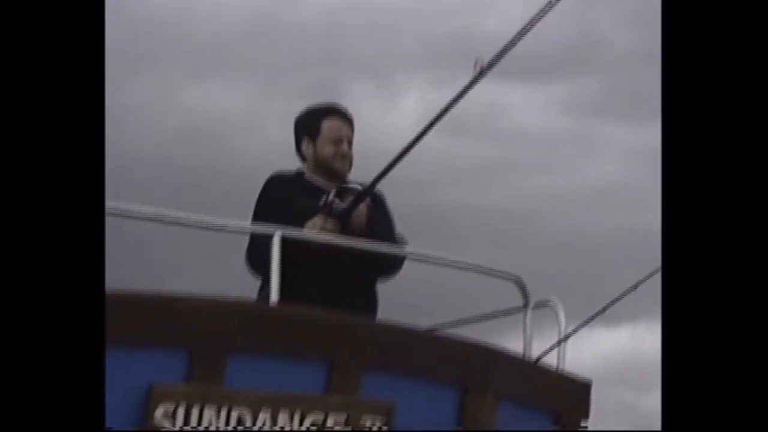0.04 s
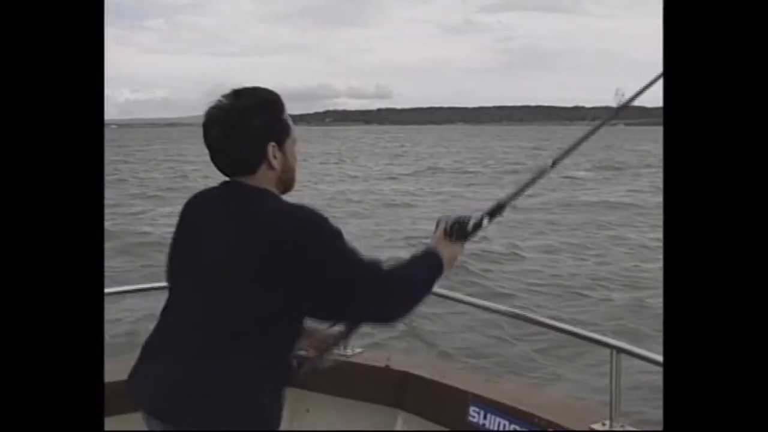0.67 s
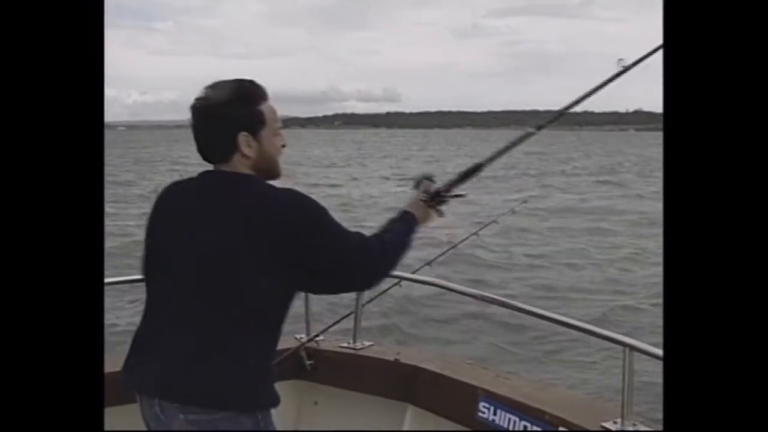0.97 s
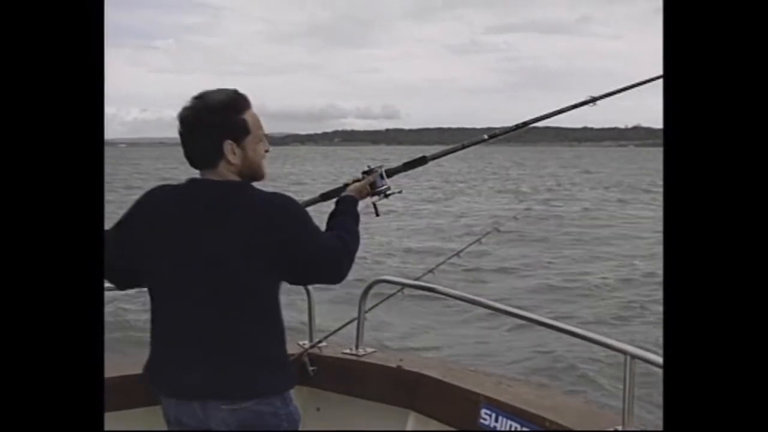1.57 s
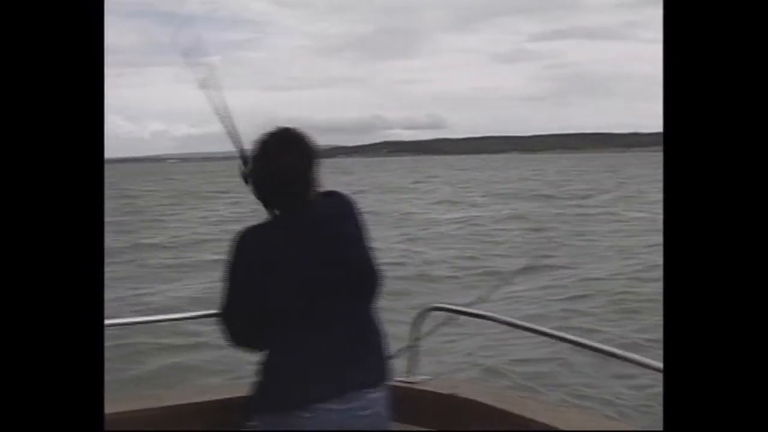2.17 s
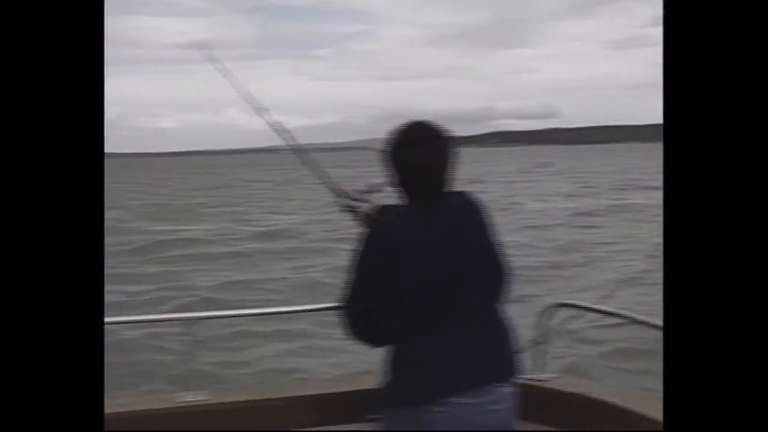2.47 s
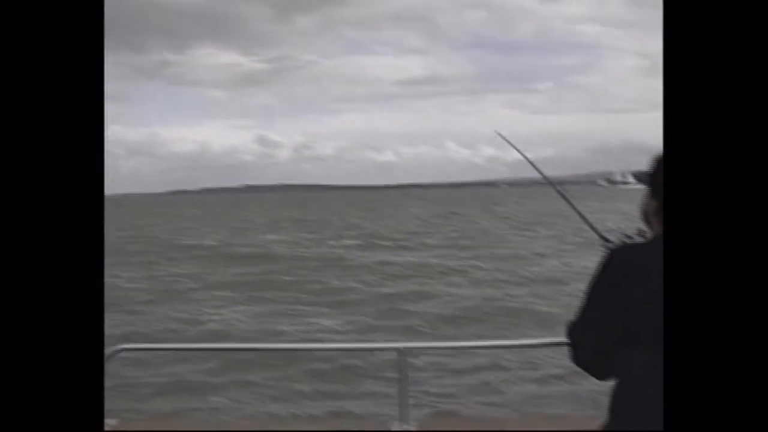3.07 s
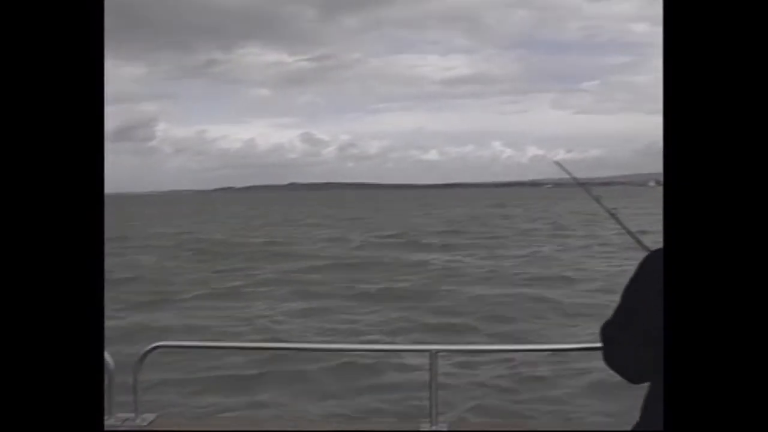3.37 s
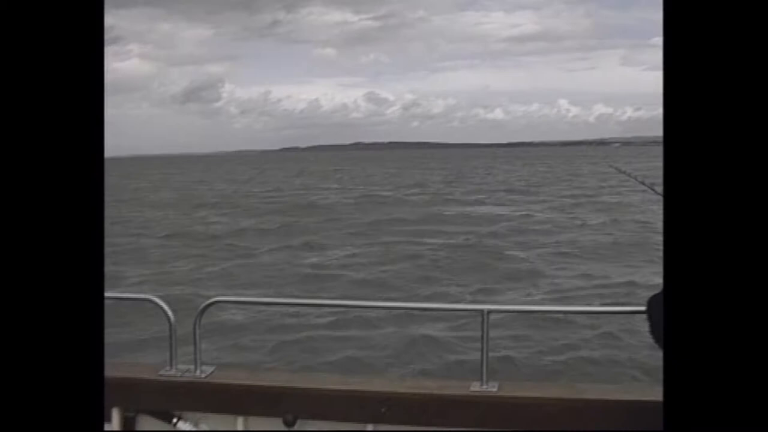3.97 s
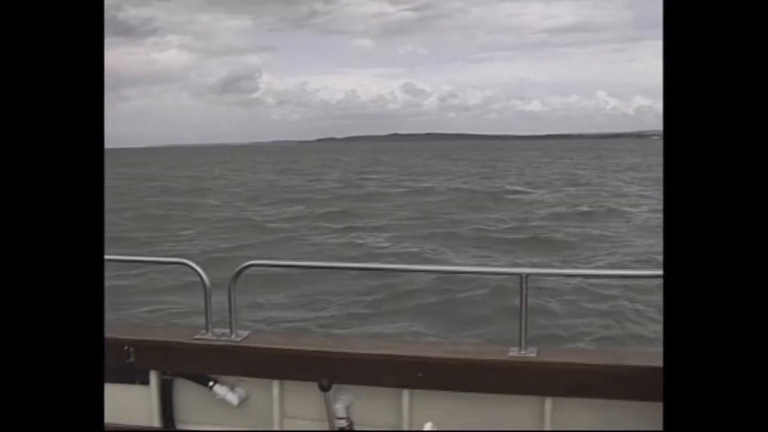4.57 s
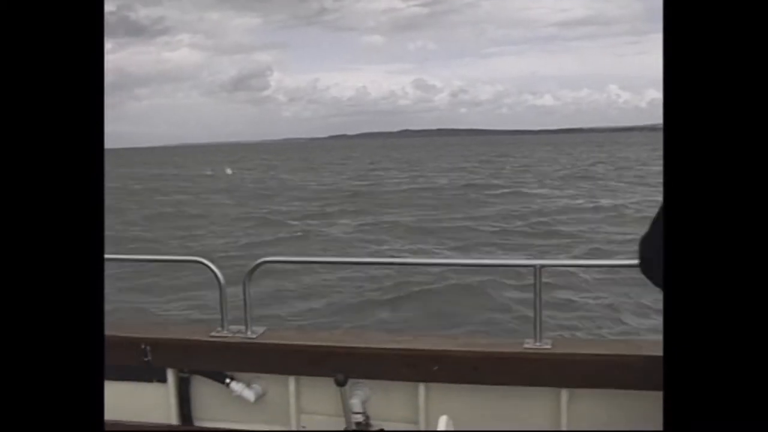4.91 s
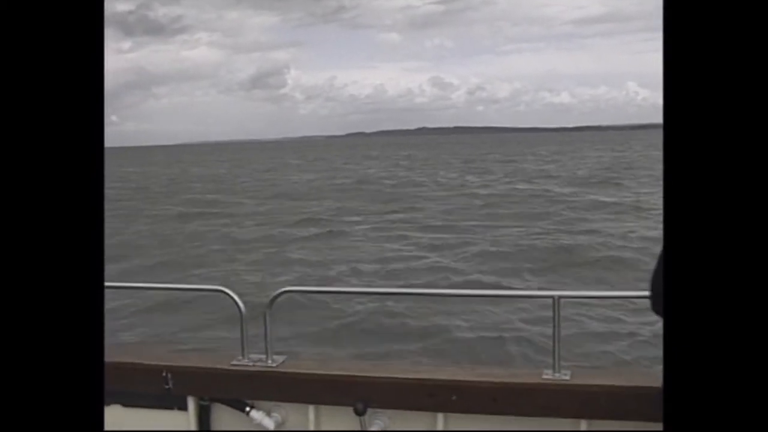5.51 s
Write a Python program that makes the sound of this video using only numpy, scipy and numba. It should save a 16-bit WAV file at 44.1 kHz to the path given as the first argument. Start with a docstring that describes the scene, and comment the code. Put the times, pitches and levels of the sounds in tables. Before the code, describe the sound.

Gusty wind buffets the microphone on a boat at sea, over a faint fishing rod swish and line hissing off the reel.

```python
"""Gusty wind buffets a camcorder microphone on the open deck of a boat while an angler casts.
Eddies rumble and thump on the microphone's port and tear into a rasp as the flow turns rough.
Far below the wind, the rod swishes, a sleeve snaps, the reel ticks and line hisses off the slowing
spool, over a faint wash of sea and the camcorder's own hiss and whine."""
import sys
import numpy as np
from scipy import signal
from scipy.fft import rfft, irfft
from scipy.io import wavfile
from scipy.ndimage import uniform_filter1d
from numba import njit

SR = 44100
rng = np.random.default_rng(int(sys.argv[2]) if len(sys.argv) > 2 else 0)


def put_to_file(sound):
    """Save the sound as 16-bit audio at rate SR, in the file named by the first command-line argument."""
    columns = np.atleast_2d(sound).T  # one column per channel
    safe = np.clip(columns, -1, 1)
    whole_steps = np.round(safe * 32767)
    wavfile.write(sys.argv[1], SR, whole_steps.astype(np.int16))


N = 249165
TIME = np.arange(N) / SR
FREQ = np.maximum(np.arange(N // 2 + 1) * SR / N, 1)

# line running off the spool after the cast: t/s, level/dB, brightest ring f/Hz
LINE_RUN = [(2.3, -76, 10160), (2.75, -64.5, 11750), (3.2, -67, 12800), (3.55, -65, 13100),
            (3.92, -65.5, 13100), (4.15, -63, 13300), (4.45, -62, 12660), (4.78, -60.5, 12750),
            (5.07, -60.5, 13800), (5.2, -65, 13800), (5.65, -72, 12800)]
RUN_START_S = LINE_RUN[0][0]


def undb(db):
    """Decibels to gain."""
    return 10 ** (np.asarray(db) / 20)


def unit(x):
    """Scale to rms 1."""
    return x / np.sqrt(np.mean(x ** 2))


def curves(table):
    """One automation curve per column, in straight lines between the times of the first column."""
    times, *columns = np.transpose(table)
    return [np.interp(TIME, times, column) for column in columns]


def swell(s, half_s):
    """A bell-shaped rise and fall around the time s."""
    return np.exp(-((TIME - s) / half_s) ** 2 / 2)


def swells(rows):
    """Envelope of several swells (t/s, half length/s, level/dB); their powers add."""
    return np.sqrt(sum((undb(db) * swell(s, half_s)) ** 2 for s, half_s, db in rows))


def colour(points):
    """EQ curve through points (f/Hz, level/dB), rolled off beyond both ends."""
    hz, db = np.transpose(points)
    ends = np.minimum(FREQ / hz[0], 1) * np.minimum(hz[-1] / FREQ, 1)
    return undb(np.interp(np.log(FREQ), np.log(hz), db)) * ends ** 2


def resonance(hz, width_hz):
    """Response of one band-pass resonance."""
    return 1 / (1 + 1j * (FREQ ** 2 - hz ** 2) / (FREQ * width_hz))


def shaped(x, response):
    """Filter a sound and scale it to rms 1."""
    return unit(irfft(rfft(x) * response, N))


def noise(response):
    """Fresh noise through a filter, rms 1."""
    return shaped(rng.standard_normal(N), response)


def wander(rate_hz):
    """Smooth random modulation, rms 1, moving at up to about rate_hz."""
    return noise(np.exp(-(FREQ / rate_hz) ** 2))


def even(x, span_s):
    """Ride the level so that it holds near rms 1 over spans longer than span_s."""
    size = max(int(span_s * SR), 2)
    return x / np.sqrt(uniform_filter1d(uniform_filter1d(x ** 2, size), size))


def burst(response, s, t60):
    """A hit of noise at s that dies away and sounds through a body, peak 1."""
    age = TIME - s
    decay = (age >= 0) * np.exp(-np.log(1000) * np.abs(age) / t60)
    hit = shaped(even(rng.standard_normal(N), 0.0023) * decay, response)
    return hit / np.abs(hit).max()


@njit
def moving_band(x, hz, width_hz):
    """State-variable band-pass whose centre glides."""
    out, band_state, low_state = np.empty(len(x)), 0., 0.
    for i in range(len(x)):
        tuning = np.tan(np.pi * min(hz[i], .45 * SR) / SR)
        damping = width_hz[i] / hz[i]
        band = (band_state + tuning * (x[i] - low_state)) / (1 + tuning * (tuning + damping))
        band_state = 2 * band - band_state
        low_state += 2 * tuning * band
        out[i] = damping * band
    return out


def sea(chop_db=-59, froth_db=1.5):
    """Choppy water washes along the hull, swelling with each wave, its froth flickering quickly."""
    # waves along the hull: t/s, half length/s, level/dB
    waves = [(.25, 1, -60), (2.35, 0.22, -53), (2.9, 0.11, -59.5), (3.76, 0.09, -55), (4.42, 0.4, -59),
             (4.79, 0.041, -56.5), (5.3, 0.47, -58.5)]
    # tone of the wash: f/Hz, level/dB
    wash_eq = [(250, -14), (600, 2.5), (1200, -0.5), (2000, -11), (2800, -17), (4000, -23), (7000, -24),
               (14000, -22)]
    return np.hypot(undb(chop_db), swells(waves)) * undb(froth_db * wander(60)) * noise(colour(wash_eq))


def turn_rate(start_hz=185.4, drag_per_s=0.24):
    """Turns a second of the spool, which slows under drag once the line runs."""
    return start_hz / (1 + drag_per_s * np.maximum(TIME - RUN_START_S, 0))


def each_turn(x, feedback=0.61, turns=7):
    """Each turn of the spool drags the line over the same flaws: a comb whose teeth sink in pitch."""
    turn_ago = np.maximum(np.arange(N) - np.round(SR / turn_rate()).astype(int), 0)
    combed = x
    for _ in range(turns):
        combed = x + feedback * combed[turn_ago]
    return unit(combed)


def spool_ring(hz, width_hz):
    """Friction noise from the turning spool in one steep resonance that glides, rms 1."""
    width = width_hz * np.ones(N)
    friction = each_turn(rng.standard_normal(N), feedback=0.72)
    return unit(moving_band(moving_band(friction, hz, width), hz, width))


def whistles(count=26, span_s=(2.65, 4.7), level_db=-15, pitch_spread=.07):
    """Single overtones of the spool whistle briefly near the brightest ring and sink as it slows."""
    _, ring_hz = curves(LINE_RUN)
    rate = turn_rate()
    turns = np.cumsum(rate) / SR
    out = 0
    for s, (accent, detune) in zip(np.linspace(*span_s, count), rng.standard_normal((count, 2))):
        overtone = np.round(np.interp(s, TIME, ring_hz / rate) * (1 + pitch_spread * detune))
        tone = np.sqrt(2) * np.sin(2 * np.pi * overtone * turns)
        out += undb(level_db + 2 * accent) * swell(s, half_s=.09) * tone
    return out


def whirr():
    """The spinning spool whirrs, thin while it is fast and raspy as it slows."""
    # the spool's resonance: t/s, f/Hz, level/dB, width/Hz
    spool = [(2.3, 4210, -80, 700), (2.95, 4180, -78, 350), (3.4, 4020, -77.5, 350), (3.9, 3800, -81, 600),
             (5.1, 4360, -85, 1300), (5.42, 4160, -71, 1000), (5.65, 4100, -80, 900)]
    hz, db, width_hz = curves(spool)
    return undb(db) * even(spool_ring(hz, width_hz), 0.044)


def squeaks(width_ratio=0.12):
    """The line squeaks on the rod's rings in narrow bands of noise."""
    # squeaks: t/s, level/dB, half length/s, f/Hz
    rubs = [(0.814, -67.5, 0.028, 7850), (0.89, -65, 0.015, 13000), (0.887, -75, .025, 4350),
            (2.303, -66, 0.032, 11900), (2.32, -72, .03, 7400), (2.609, -58, .012, 10600),
            (2.607, -67, .012, 7400), (3.06, -68, .04, 11300), (4.75, -70, .055, 12550),
            (4.77, -69, .05, 15150), (5.087, -69.5, 0.065, 7000), (5.088, -71, 0.055, 4500),
            (5.32, -69, .035, 6450)]
    return sum(undb(db) * swell(s, half_s) * noise(resonance(hz, width_ratio * hz) ** 2)
               for s, db, half_s, hz in rubs)


def line(draw_db=-65.5, hiss_db=-4.5, waver=0.015, flutter_db=0.5, stutter_db=2, throb_db=2):
    """Coils rub over the lip of the spool: a hiss with gliding rings that throbs once a turn."""
    # resonances of the coils: ratio to the brightest ring, width/Hz, level/dB
    coil_rings = [(.5, 2400, 1.4), (.79, 2700, 2.1), (1, 2700, 8.6), (1.19, 2200, 5.6)]
    # tone of the rubbing line: f/Hz, level/dB
    hiss_eq = [(2500, -15.5), (4200, -6), (5200, -23.5), (6500, -3.5), (8500, -2.5), (11000, -1.5),
               (15500, 0)]
    run_db, ring_hz = curves(LINE_RUN)
    running = np.where(TIME < RUN_START_S, swell(RUN_START_S, half_s=.13), 1)
    draw = undb(draw_db) * swell(0.97, half_s=0.11)  # a little line slides before the cast
    sliding = running * undb(run_db) + draw
    rings = sum(undb(db + 1.4 * wander(12)) * spool_ring(ratio * ring_hz * (1 + waver * wander(9)), width)
                for ratio, width, db in coil_rings)
    rub = sliding * (unit(rings) + whistles() + undb(hiss_db) * noise(colour(hiss_eq)))
    friction = rub + running * whirr() + squeaks()
    # as the line goes slack it catches and slips unevenly
    catching_db = (flutter_db + stutter_db * swell(5.1, half_s=.3)) * wander(150)
    throb = np.cos(2 * np.pi * np.cumsum(turn_rate()) / SR)
    return friction * even(undb(catching_db + throb_db * throb), .08)


def scratch(peak_s=2.47, fade_s=0.93, level_db=-60.5, clicks_per_s=1500, scatter_db=8):
    """Fresh off a full spool, coils catch on the lip in a dense spray of tiny clicks, then settle."""
    # tone of the spray: f/Hz, level/dB
    spray_eq = [(2500, -11), (5000, -28), (7800, -20), (9200, 5), (15500, 18)]
    clicks = (rng.random(N) < clicks_per_s / SR) * rng.choice([-1, 1], N)
    accents = undb(scatter_db * np.minimum(rng.exponential(size=N), 4))
    envelope = np.where(TIME < peak_s, swell(peak_s, half_s=.14), np.exp(-(TIME - peak_s) / fade_s))
    return undb(level_db) * envelope * shaped(each_turn(clicks * accents), colour(spray_eq))


def reel(dry_db=-9):
    """Small parts click and ring the reel's body, each tick with its own brightness."""
    # modes of the reel's body: f/Hz, width/Hz, level/dB
    modes = [(1910, 660, 20.5), (3640, 1400, -2), (6400, 1700, -3), (8300, 840, -12), (11000, 1300, -1),
             (13900, 2500, 4)]
    # ticks of reel and tackle: t/s, peak level/dB, band centre f/Hz, t60/s
    ticks = [(.3577, -48, 11000, 0.022), (0.4833, -33.5, 9600, 0.013), (0.4993, -40.5, 5840, 0.0087),
             (1.0754, -43, 6500, 0.0085), (1.083, -44, 4800, 0.057), (2.0433, -41, 5500, 0.00098),
             (2.209, -47, 8000, 0.014), (2.3686, -51, 13000, 0.024), (2.48, -52, 3400, 0.025),
             (2.503, -49, 2400, 0.019), (2.5176, -45, 11000, 0.018), (2.6114, -49, 8500, 0.019),
             (2.876, -44, 13000, .012), (2.8915, -40, 13000, 0.04), (2.932, -52, 11700, 0.024),
             (2.961, -52, 13500, .01), (3.2422, -39, 13000, .012), (3.256, -49, 8440, .02),
             (3.271, -46, 13500, 0.014), (4.247, -50, 8900, 0.011), (4.902, -48, 8500, .008),
             (5.5, -44, 10500, 0.024)]
    mode_power = sum(np.abs(undb(db) * resonance(hz, width)) ** 2 for hz, width, db in modes)
    body = np.sqrt(undb(dry_db) ** 2 + mode_power)
    return sum(undb(db) * burst(body * resonance(hz, 1.1 * hz) ** 2, s, t60) for s, db, hz, t60 in ticks)


def grip_scrape(level_db=-56.5, hz=2260):
    """The hand shifts on the rod's grip with a soft scrape."""
    return undb(level_db) * swell(1.074, half_s=0.014) * noise(resonance(hz, width_hz=hz) ** 2)


def rod_swish(width_ratio=0.74, top_hz=2400, leak_db=-19):
    """Rod and arm shed vortices in a broad band as they sweep through the air."""
    # sweeps of the cast: t/s, level/dB, half length/s, centre f/Hz
    sweeps = [(2.108, -40.5, 0.028, 1030), (2.244, -45.5, 0.0094, 1670), (2.283, -50, 0.032, 1480),
              (2.374, -50.5, 0.013, 1570), (2.52, -57.5, 0.018, 1630)]
    shelf = 1 / np.sqrt(1 + (FREQ / top_hz) ** 20) + undb(leak_db)
    return sum(undb(db) * swell(s, half_s) * noise(resonance(hz, width_ratio * hz) ** 2 * shelf)
               for s, db, half_s, hz in sweeps)


def sleeve(top_hz=1300, crack_db=-7.5):
    """A sleeve snaps taut at the end of the throw and flaps back: dry thumps with a crack of cloth."""
    # thumps of the sleeve: t/s, peak level/dB, f/Hz
    flaps = [(2.242, -16, 480), (2.2453, -20.5, 480)]
    # tone of the crack: f/Hz, level/dB
    cloth_eq = [(300, -2), (600, 7), (900, 0), (1200, -3), (2200, -24.5), (3000, -38), (9000, -62)]
    out = 0
    for s, db, hz in flaps:
        push = resonance(hz, width_hz=hz) * np.exp(-(FREQ / top_hz) ** 2)
        thump = irfft(push * np.exp(-2j * np.pi * FREQ * s), N)  # delayed to the time s
        crack = undb(crack_db) * burst(colour(cloth_eq), s, t60=0.02)
        out += undb(db) * (thump / np.abs(thump).max() + crack)
    return out


def puffs(hz=560, width_hz=520, top_hz=1150):
    """A small eddy bursts on the rim of the port with a short, dull pop."""
    # pops on the rim: t/s, peak level/dB
    pops = [(.162, -51), (0.32, -41), (0.419, -38), (.616, -39), (0.641, -40), (0.826, -29), (0.859, -34),
            (0.89, -29), (0.984, -33.5), (1.037, -36), (1.259, -22.5), (1.978, -34), (4.222, -37),
            (4.785, -35)]
    dull = resonance(hz, width_hz) ** 2 / np.sqrt(1 + (FREQ / top_hz) ** 10)
    return sum(undb(db) * burst(dull, s, t60=0.044) for s, db in pops)


def buffets():
    """A strong eddy thumps the port, swinging its pressure for a few cycles at most."""
    # single strong eddies: t/s, envelope level/dB, f/Hz, half length/s
    thumps = [(0.163, -18, 111, 0.009), (.418, -18.5, 169, 0.016), (0.829, -7.5, 152, 0.003),
              (.901, -8.5, 159, 0.0047), (1.399, -9, 152, 0.0038), (1.446, -7.5, 217, 0.0029),
              (1.973, -9.5, 112.4, 0.0072), (2.192, -14.5, 96, 0.014), (2.38, -12.5, 172, 0.013),
              (2.919, -27, 124, 0.013), (3.58, -25.5, 204, 0.018), (4.058, -18, 124, 0.025),
              (4.806, -15.5, 69.6, 0.0075), (4.879, -14.5, 79, 0.017), (5.373, -21, 45.3, 0.0091),
              (5.463, -15, 47.3, 0.014), (5.565, -17, 38, 0.017)]
    out = 0
    for (s, db, hz, half_s), phase in zip(thumps, rng.random(len(thumps))):
        age = TIME - s
        out += undb(db) * np.exp(-(age / half_s) ** 2) * np.cos(2 * np.pi * (hz * age + phase))
    return out


def tear_at_rim(eddies, rough_db, split_hz=900, trim_db=-2.5, lift_per_db=0.39):
    """A hard, rough flow tears at the rim of the port, lifting the finest eddies into a rasp."""
    # surges of rasp: t/s, half length/s, lift/dB
    tears = [(0.87, 0.066, 6.5), (1.279, 0.062, 1), (1.49, 0.059, 6), (1.707, 0.043, 6.5)]
    finest = irfft(rfft(eddies) / (1 + (split_hz / FREQ) ** 4), N)
    surge_db = sum(lift * swell(s, half_s) for s, half_s, lift in tears)
    rasp_db = trim_db + lift_per_db * (rough_db - np.mean(rough_db)) + surge_db
    # at the height of the main gust the rasp closes up from spurts into a steady roar
    roar = swell(1.55, half_s=.25)
    rasp = (1 - roar) * finest + roar * even(finest, .02) * np.std(finest)
    return eddies - finest + rasp * undb(rasp_db)


def wind(slow_hz=100, fast_hz=320, rumble_db=-10, unsteady_db=0.34, even_s=0.082,
         patchy_db=1.78, suction_db=1.16, gust_bunching=0.35):
    """Eddies of three sizes cross the port: slow rumble, a body, and small fast ones shed in bunches."""
    # the wind builds, then drops as the microphone turns with the cast: t/s, level/dB
    breeze = [(0, -24.5), (.55, -28), (.8, -30), (.95, -26), (1.36, -18), (1.7, -19), (1.98, -21.5),
              (2.04, -35), (2.4, -28), (2.62, -31), (2.8, -28), (3.0, -34), (4.35, -31.5), (4.6, -35),
              (5.2, -34.5), (5.65, -32)]
    # how much of it breaks into small eddies: t/s, level/dB against the body
    roughness = [(0, -18), (.7, -17), (.86, -7.5), (.95, -13), (1.05, -4.5), (1.18, -10.5), (1.32, -6.5),
                 (1.78, -7), (1.87, -13), (2.15, -16.5), (2.5, -18), (2.68, -11), (2.94, -24), (3.1, -16),
                 (4.0, -12), (4.65, -8), (5.05, -10), (5.65, -14.5)]
    # short gusts, each with a large slow eddy: t/s, half length/s, lift/dB, rumble level/dB
    gusts = [(0.165, 0.028, 1.5, -22.5), (0.348, 0.09, 2, -25), (0.716, 0.093, 4.5, -25.5),
             (0.851, 0.043, 4, -22), (1.217, 0.041, 0.5, -21), (1.5, 0.057, -1.5, -38.5),
             (1.949, 0.077, 1, -20.5), (2.165, 0.072, 0.5, -28.5), (2.379, 0.0092, 7.5, -37),
             (2.502, 0.05, 5.5, -42), (2.709, 0.058, 3, -56), (2.925, 0.027, 5.5, -32),
             (3.084, 0.047, 6.5, -33), (3.305, 0.063, 3.5, -30.5), (3.522, 0.056, 5.5, -29.5),
             (3.789, 0.02, 6, -33), (4.003, 0.25, -1, -28.5), (4.311, 0.026, 2.5, -50),
             (4.486, 0.014, 1.5, -19.5), (4.817, 0.082, 4.5, -28.5), (4.934, 0.046, -3.5, -30),
             (5.108, 0.02, 6, -35), (5.296, 0.11, 0, -29.5), (5.536, 0.12, 2.5, -22)]
    # tone of rumble and body: f/Hz, level/dB
    wind_eq = [(13, -18), (22, -27), (76, -9), (157, -1.5), (354, -9.5), (442, -8), (899, -6.5),
               (2800, -54), (3640, -84.5), (6160, -120)]
    # tone of the small eddies: f/Hz, level/dB
    fast_eq = [(150, 15), (330, 3), (500, -5.5), (800, -16), (1250, -29.5), (2000, -40), (3200, -51),
               (6000, -63.5), (14000, -67)]
    (breeze_db,), (rough_db,) = curves(breeze), curves(roughness)
    gust_db = sum(lift * swell(s, half_s) for s, half_s, lift, _ in gusts)
    body_db = breeze_db + gust_db + unsteady_db * wander(16)
    fast_db = body_db + rough_db
    gust_rumble = swells([(s, half_s, db) for s, half_s, _, db in gusts])
    rumble_gain = np.hypot(undb(breeze_db + rumble_db), gust_rumble)

    lows = 1 / np.sqrt(1 + (FREQ / slow_hz) ** 10)
    highs = 1 / np.sqrt(1 + (fast_hz / FREQ) ** 10)
    mids = np.sqrt((1 - lows ** 2) * (1 - highs ** 2))
    rumble = even(noise(colour(wind_eq) * lows), 1.9 * even_s)
    body = even(noise(colour(wind_eq) * mids), even_s)
    # small eddies are strongest in the suction half of each pressure swing, and bunch more in a gust
    bunch_depth = undb(gust_bunching * (fast_db - np.mean(fast_db)))
    bunches = undb((patchy_db * wander(42) - suction_db * body) * bunch_depth)
    fast = even(shaped(rng.standard_normal(N) * bunches, colour(fast_eq) * highs), even_s)
    return rumble * rumble_gain + body * undb(body_db) + tear_at_rim(fast, rough_db) * undb(fast_db)


def scene():
    """Wind in front, angler and sea far below it, in mono."""
    air = wind() + buffets() + puffs()
    angler = rod_swish() + sleeve() + reel() + grip_scrape() + line() + scratch()
    return (air + angler + sea())[None]


def record(dry, hiss_db=-68, whine_db=-76.5, whine_hz=15625, low_hz=36, top_hz=15750):
    """The camcorder adds hiss and its line-scan whine, loses the deepest rumble and cuts the top."""
    # tone of the camcorder's hiss: f/Hz, level/dB
    hiss_eq = [(1000, 9), (4000, -4), (8000, -1.5), (12000, -3), (15500, -3)]
    hiss = undb(hiss_db) * noise(colour(hiss_eq))
    whine = undb(whine_db) * np.sqrt(2) * np.sin(2 * np.pi * whine_hz * TIME)
    sound = irfft(rfft(dry + hiss + whine) / np.sqrt(1 + (low_hz / FREQ) ** 14), N)
    fade_in = np.minimum(TIME / .003, 1)
    top_cut = signal.ellip(12, .1, 80, top_hz, fs=SR, output="sos")
    return signal.sosfilt(top_cut, sound * fade_in)


dry = scene()
out = record(dry)
put_to_file(out)
```